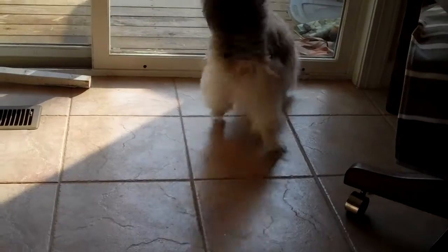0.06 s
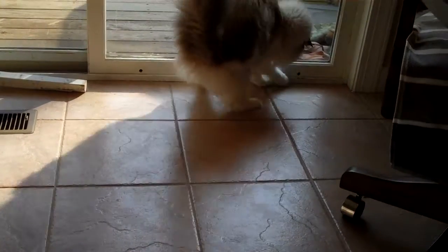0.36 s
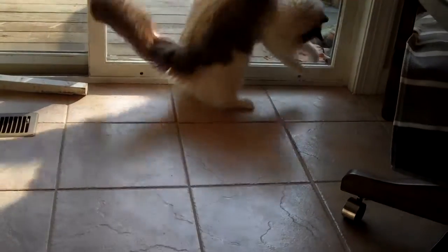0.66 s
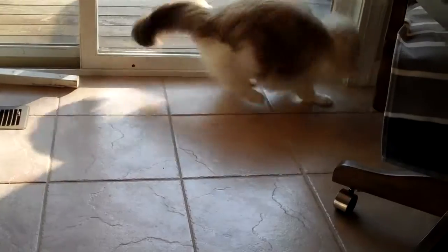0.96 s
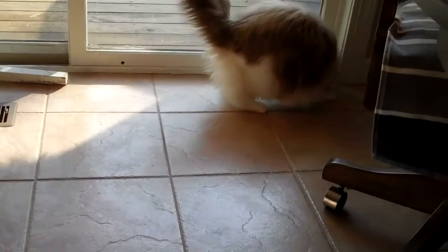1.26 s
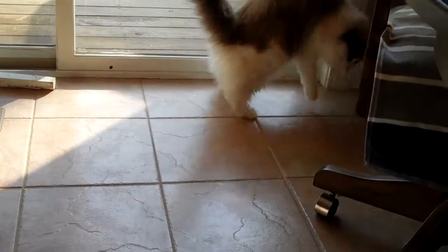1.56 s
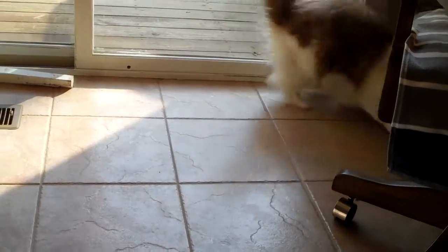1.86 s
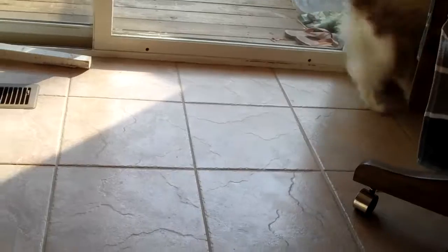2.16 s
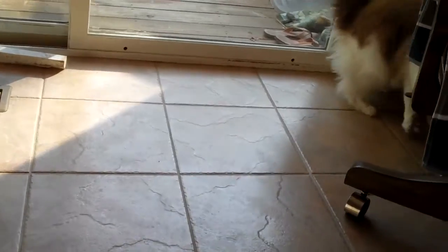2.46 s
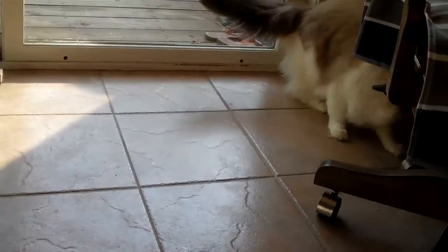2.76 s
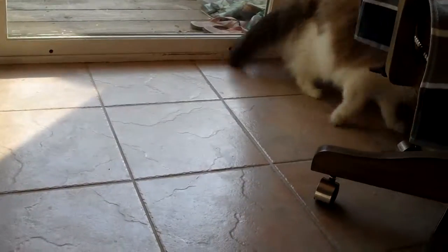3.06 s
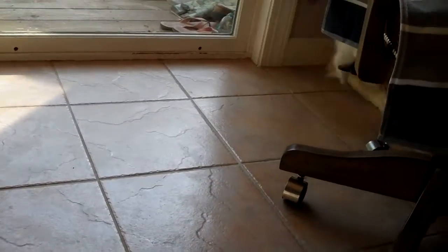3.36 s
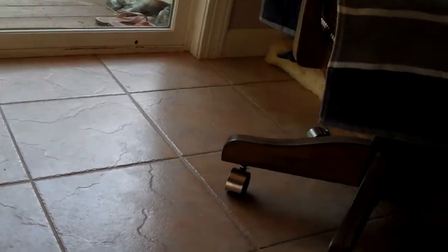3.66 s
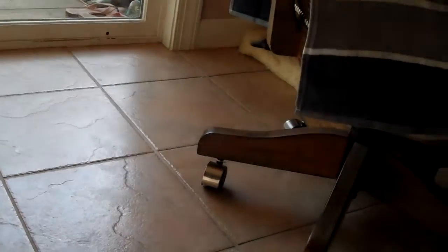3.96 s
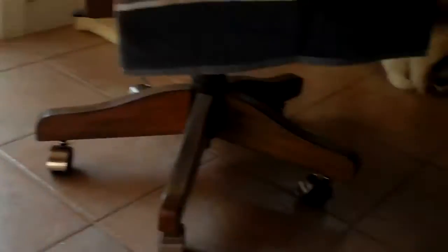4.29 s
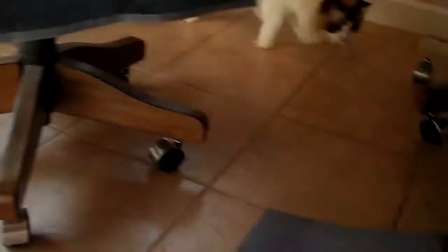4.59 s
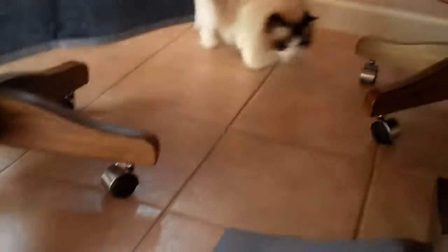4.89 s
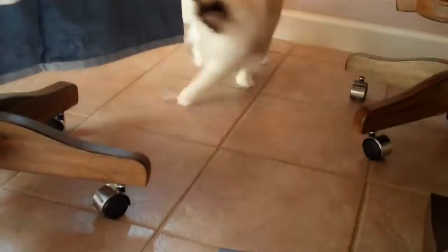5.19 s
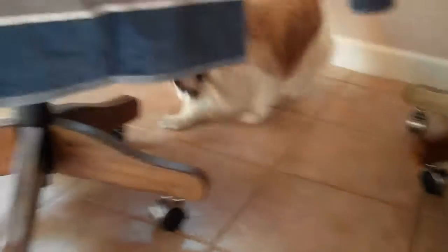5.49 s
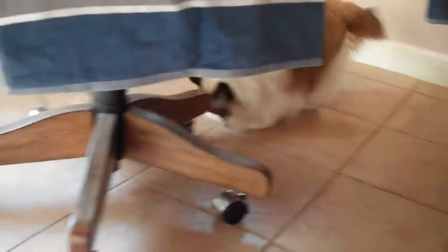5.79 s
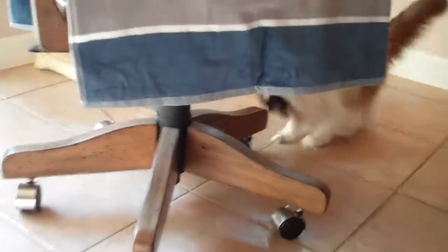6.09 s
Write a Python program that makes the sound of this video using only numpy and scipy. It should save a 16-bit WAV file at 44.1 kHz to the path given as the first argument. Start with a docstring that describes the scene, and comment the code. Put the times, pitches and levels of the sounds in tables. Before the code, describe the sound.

Over faint, steady microphone hiss, a cat's claws click and slip irregularly on tile, mixed with soft paw thuds and small wooden rattles from a bumped door. One landing thumps harder than the rest. Things quieten to a grainy rustle of fur and pads, before two more short bursts of tapping and scraping end in gentle steps. The small indoor room adds a short echo.

```python
"""A cat plays on a tiled floor beside a glass door in a small quiet room, over faint microphone hiss.
It starts with a few soft steps, then scrabbles: claws tick and skid on the glaze, and knocks set the
door rattling in its frame. Near two seconds a pounce lands, the pads thumping the floor hardest.
A lull follows, mostly fur and pads brushing along. A second flurry comes around four seconds,
a last scrabble just after five, and the cat settles with a few light footfalls."""
import sys
import numpy as np
from scipy import signal
from scipy.fft import rfft, irfft
from scipy.io import wavfile

SR = 44100
rng = np.random.default_rng(int(sys.argv[2]) if len(sys.argv) > 2 else 0)


def master(y):
    """Save y as 16-bit WAV."""
    cut = np.clip(np.atleast_2d(y).T, -1, 1)
    pcm = np.round(cut * 32767)  # scale
    wavfile.write(sys.argv[1], SR, pcm.astype(np.int16))


N = 270774
EVENT_SIZE, HIT_SIZE = 22050, 4096   # samples in a long and in a short sound
AGE = np.arange(EVENT_SIZE) / SR   # seconds since a sound began

# Tone colour of claw friction on the glaze: frequency_hz, level_db
CLAW_SPECTRUM = [(200, -9), (500, -7.5), (900, -10), (1400, -6), (1750, -0.5), (2300, 2), (2800, -1),
                 (3350, 1.5), (4000, 0), (5200, -1), (6500, -5), (8700, -9), (11000, -19.5), (14500, -42)]


def claw_ticks():
    """A claw tip rings for a few cycles, with a gritty edge where it bites the glaze."""
    # Claw tips tapping tile: start_s, level_db, pitch_hz
    taps = [(.4505, -31.5, 4500), (.478, -16, 6140), (0.5138, -38, 5160), (0.8499, -23.5, 4100),
            (0.8522, -21, 7700), (.947, -25.5, 4260), (.96, -34, 3850), (1.014, -24, 3220),
            (1.0161, -20.5, 6700), (1.0205, -27, 2500), (1.1138, -20, 4730), (1.119, -20.5, 3420),
            (1.9455, -34.5, 2560), (2.0044, -25.5, 8300), (2.593, -38, 5960), (2.8142, -32, 2940),
            (3.738, -43, 3570), (3.9018, -31, 2800), (3.92, -24.5, 3360), (4.107, -31.5, 2550),
            (4.31, -42, 4300), (4.374, -25, 8300), (4.513, -39, 4570), (5.053, -39, 4460),
            (5.1772, -28, 6600), (5.2326, -24.5, 3700), (5.306, -33, 5370), (5.45, -25, 5360),
            (5.4855, -29, 2120)]
    light_tap_db, light_tap_cycles, choke_share = -24, 8.8, 0.53
    out = np.zeros((2, N))
    for start_s, level_db, pitch_hz in taps:
        grit = coloured(rng.standard_normal((2, HIT_SIZE)), CLAW_SPECTRUM, tilt_db=8.0)
        grit *= np.exp(-AGE[:HIT_SIZE] / 0.00063)
        # A harder tap chokes the ring.
        cycles = light_tap_cycles * from_db(choke_share * (light_tap_db - level_db))
        tick = contact(pitch_hz, cycles, rise_cycles=0.36)[:HIT_SIZE] + from_db(-11) * grit
        add(out, start_s, from_db(level_db) * scatter(tick, echo_db=-3.5, spread_s=0.0092))
    softness_hz = 12500   # a claw is too soft to give the very highest treble
    out = signal.sosfilt(signal.butter(4, softness_hz, fs=SR, output="sos"), out)
    return from_db(0.5) * room(tile_ring(out), tail_db=-8)


def claw_skids():
    """Claws catch and slip rapidly as the paw slides, then lift off and leave the pad dragging."""
    # Slides across the glaze: start_s, level_db, length_s, tilt_db (per octave)
    skids = [(.002, -37, 0.026, -1), (0.395, -45.5, 0.022, 3.5), (0.453, -38.5, 0.015, 1),
             (0.514, -35.5, 0.0024, 1), (0.695, -42, .013, -10.5), (0.724, -49, 0.0093, 5),
             (.849, -34, 0.0026, 7.5), (1.013, -34.5, 0.014, -0.5), (1.108, -40, 0.0021, 14),
             (1.113, -34.5, 0.021, -1), (1.42, -45, 0.01, -2.5), (1.526, -47.5, 0.017, -4),
             (1.659, -40.5, 0.0075, -9), (1.912, -38.5, 0.0033, -7.5), (1.999, -43, 0.016, -1),
             (2.031, -43, 0.031, 5.5), (2.159, -49, 0.0097, -7.5), (2.671, -47.5, 0.0081, 4),
             (2.812, -36, 0.0031, -1), (3.734, -43.5, 0.033, 1), (3.901, -36, 0.022, 1),
             (4.103, -38.5, 0.021, 1), (5.175, -36, 0.0019, 4.5), (5.337, -43, 0.0058, 0.5),
             (5.445, -35, 0.03, 5), (5.763, -50, 0.0075, 0), (5.955, -54.5, 0.022, 5.5)]
    drag_db, drag_fade_s = -21, 0.06
    out = np.zeros((2, N))
    for start_s, level_db, length_s, tilt_db in skids:
        since_lift = np.maximum(AGE - length_s, 0)
        fade_s = 0.0046 + 0.87 * length_s
        claw_release = np.exp(-since_lift / fade_s)
        pad_drag = from_db(drag_db) * np.exp(-since_lift / drag_fade_s)
        pressure = (1 - np.exp(-AGE / 0.00016)) * np.maximum(claw_release, pad_drag)
        slips = coloured(stick_slip(catches_per_s=1200, spread_db=1.5), CLAW_SPECTRUM, tilt_db)
        add(out, start_s, from_db(level_db) * pressure * slips)
    return from_db(-1.83) * room(tile_ring(out), tail_db=-4.5)


def paw_thumps():
    """A soft pad gives the floor a slow push and sets its low modes booming; the toes settle after it."""
    # Paw landings: start_s, level_db, pitch_hz
    landings = [(0.014, -39.5, 133), (.252, -37, 106), (0.447, -44, 88), (0.51, -46.5, 88),
                (.698, -37.5, 125), (1.021, -42, 225), (1.117, -35.5, 118), (1.161, -39, 136),
                (1.918, -19.5, 293), (1.943, -30, 210), (1.992, -34, 268), (2.07, -41, 125),
                (2.165, -28, 154), (2.817, -43, 172), (3.41, -51, 106), (3.632, -32.5, 122),
                (3.663, -29, 128), (3.734, -31.5, 113), (4.057, -44, 116), (4.108, -40, 94.5),
                (4.229, -37.5, 90), (4.349, -50.5, 97), (4.653, -48, 81), (4.815, -50.5, 77.4),
                (5.34, -51, 94), (5.449, -50, 99), (5.735, -38, 88), (5.792, -52, 129), (5.894, -46, 83)]
    # Boom of the floor and the room above it: pitch_hz, gain_db, t60_s
    floor_modes = [(67.7, 12.5, 0.52), (125, -1.5, 0.13), (216, 5.5, 0.28), (254, 4, 0.2),
                   (300, -9.5, 0.053), (488, 9, 0.27), (524, -31, 0.16)]
    toes_lag_s, toes_db, toes_pitch_ratio = 0.00594, -9, 2.037
    out = np.zeros((2, N))
    for start_s, level_db, pitch_hz in landings:
        pad = contact(pitch_hz, ring_cycles=4.6, rise_cycles=1.7)
        toes = contact(toes_pitch_ratio * pitch_hz, ring_cycles=5, rise_cycles=2.6)
        add(out, start_s, from_db(level_db) * pad)
        add(out, start_s + toes_lag_s, from_db(level_db + toes_db) * toes)
    boom = from_db(2.5) * resonate(out, floor_modes)
    return from_db(-5.5) * room(out + boom, tail_db=-4.5)


def frame_knocks():
    """Harder touches make the wooden frame ring, and the door rattles to rest."""
    # Knocks on the door and its frame: start_s, level_db, pitch_hz, loss_db (per rebound)
    knocks = [(.005, -47.5, 650, 7), (.705, -29, 535, 2.5), (1.019, -36, 1310, 8), (1.118, -33, 630, 7.5),
              (1.24, -32.5, 1180, 8), (1.423, -35.5, 1400, 14), (1.665, -31.5, 813, 5.5),
              (1.918, -35.5, 595, 3.5), (2.813, -34, 1940, 20), (3.738, -44, 550, 6),
              (4.226, -41.5, 685, 14), (5.338, -33.5, 1810, 14)]
    # Ring of the door frame: pitch_hz, gain_db, t60_s
    frame_modes = [(314, 17, 0.26), (454, 1.5, 0.3), (518, -2, 0.059), (717, -9, 0.13), (740, 2, 0.21),
                   (825, 17, 0.12), (1083, 4, .12), (1180, 20, 0.087), (1256, -5.5, 0.03),
                   (1400, -4, 0.022), (1810, 5.5, 0.032)]
    rebound_s, rebound_jitter = 0.015, 0.301
    overtone_ratio, overtone_db = 2.24, -10
    out = np.zeros((2, N))
    for start_s, level_db, pitch_hz, loss_db in knocks:
        body = contact(pitch_hz, ring_cycles=5.1, rise_cycles=0.71)
        overtone = contact(overtone_ratio * pitch_hz, ring_cycles=5, rise_cycles=1.0)
        touch = (body + from_db(overtone_db) * overtone)[:HIT_SIZE]
        gaps_s = rebound_s * (1 + rebound_jitter * rng.uniform(-1.005, 1, size=8))
        for rebound, gap_s in enumerate(gaps_s):
            hit = scatter(touch, echo_db=-0.5, spread_s=0.0047)
            add(out, start_s, from_db(level_db - rebound * loss_db) * hit)
            start_s += gap_s
    ring = from_db(-11.5) * resonate(out, frame_modes)
    return from_db(-1.5) * room(out + ring, tail_db=-1.5)


def brushing():
    """Fur and pads slide past in fine, grainy swishes that swell and fade, over the coat's faint rustle."""
    # Tone colour of fur: frequency_hz, level_db
    fur_spectrum = [(200, -18.5), (500, -20), (1000, -13.5), (1600, -3.5), (2100, 2), (2600, 0),
                    (3600, -0.5), (5500, -3), (8500, -9), (11000, -18), (14500, -42)]
    # Level curve of the coat's rustle: time_s, level_db
    rustle_curve = [(0, -46.5), (.3, -65), (.6, -72), (1.1, -55), (1.9, -76), (2.1, -50.5), (2.42, -63.5),
                    (2.58, -55), (2.76, -62), (2.92, -57.5), (3.2, -68), (3.47, -57), (3.57, -61),
                    (4.25, -53.5), (4.65, -62.5), (4.8, -54.5), (5.0, -74), (5.5, -52), (6.14, -87)]
    # Fur and pads brushing past: centre_s, level_db, tilt_db (per octave)
    swishes = [(1.232, -45, 0.5), (1.315, -50, -5), (1.48, -53.5, -7), (1.584, -52, -2.5), (1.7, -54, -10),
               (3.145, -52.5, -1.5), (3.263, -52, -1.5), (3.366, -49.5, -4.5), (3.67, -47.5, -3.5),
               (3.848, -50.5, -5), (4.206, -46.5, -1.5), (4.474, -52.5, 6), (5.389, -45, 3)]
    rustle_db = np.interp(np.arange(N) / SR, *np.transpose(rustle_curve))
    coat = coloured(stick_slip(catches_per_s=480, spread_db=2.5, size=N), fur_spectrum, tilt_db=2)
    out = from_db(rustle_db) * coat
    lead_s, swell_s = EVENT_SIZE / SR / 2, 0.043
    swell = np.exp(-((AGE - lead_s) / swell_s) ** 2)
    for centre_s, level_db, tilt_db in swishes:
        fur = coloured(stick_slip(catches_per_s=400, spread_db=2.0), fur_spectrum, tilt_db)
        add(out, centre_s - lead_s, from_db(level_db) * fur * swell)
    return from_db(0.5) * room(out, tail_db=-11.5)


def contact(hz, ring_cycles, rise_cycles):
    """A short swing that builds as the contact closes, damped by 60 dB over ring_cycles; peak 1."""
    closing = 1 - np.exp(-AGE * hz / rise_cycles)
    swing = closing * np.sin(2 * np.pi * hz * AGE) * decay(ring_cycles / hz)
    return swing / np.abs(swing).max()


def stick_slip(catches_per_s, spread_db, size=EVENT_SIZE):
    """A pair of friction noises whose strength jumps from one catch to the next."""
    catch = np.cumsum(rng.random(size) < catches_per_s / SR)
    strengths = from_db(spread_db * np.clip(rng.standard_normal(size + 1), -2, 2))
    return strengths[catch] * rng.standard_normal((2, size))


def tile_ring(x):
    """Add the short, faint ring of the tile under a claw."""
    # Tile resonances: pitch_hz, width_hz, gain_db
    tile_peaks = [(2540, 52, -2.5), (3420, 80, 0), (3540, 31, -6), (3910, 49, -3.5), (4670, 72, -14)]
    modes = [(hz, db, np.log(1000) / (np.pi * width_hz)) for hz, width_hz, db in tile_peaks]
    return x + from_db(-3.5) * resonate(x, modes)


def scatter(sound, echo_db, spread_s):
    """Add quick echoes off floor, door and furniture, different from every spot where a paw lands."""
    age = AGE[:HIT_SIZE]
    envelope = np.exp(-age / spread_s) * (1 - np.exp(-age / 0.00061))
    response = rms_one(diffuse(HIT_SIZE) * envelope) / np.sqrt(HIT_SIZE)
    echoes = signal.fftconvolve(np.atleast_2d(sound), response, axes=1)[:, :HIT_SIZE]
    return sound + from_db(echo_db) * echoes


def room(x, tail_db):
    """Add the small room's reverb tail, which dies band by band."""
    # Reverb times: frequency_hz, t60_s
    bands = [(100, 0.41), (500, 0.45), (2000, 0.49), (6000, 0.26), (13000, 0.52)]
    hz = np.fft.rfftfreq(EVENT_SIZE, 1 / SR)
    noise, tail = rfft(diffuse(EVENT_SIZE)), 0
    for band_hz, t60_s in bands:
        band_share = at_hz([(centre_hz, centre_hz == band_hz) for centre_hz, _ in bands], hz)
        tail = tail + irfft(noise * band_share) * decay(t60_s)
    response = rms_one(tail * (1 - np.exp(-AGE / 0.0038))) / np.sqrt(EVENT_SIZE)
    return x + from_db(tail_db) * signal.fftconvolve(x, response, axes=1)[:, :N]


def background_hiss():
    """Steady microphone hiss, wide in the treble, over a faint low rumble."""
    # Tone colour of the hiss and rumble: frequency_hz, level_db
    hiss_spectrum = [(12, -78), (20, 12), (43, -3.5), (102, -7.5), (282, -4.5), (361, -9), (502, -7),
                     (1320, -9.5), (1470, -10.5), (4080, -11), (8120, -19.5), (9580, -22.5), (13000, -33.5),
                     (14500, -39)]
    # Their stereo image: frequency_hz, likeness (1 is mono)
    hiss_likeness = [(30, 0.92), (80, 0.23), (200, 0.66), (600, 0.51), (1200, 0.39), (3000, 0.066),
                     (10000, 0.091)]
    return from_db(-54.5) * coloured(rng.standard_normal((2, N)), hiss_spectrum, likeness=hiss_likeness)


def coloured(pair, spectrum, tilt_db=0, likeness=None):
    """Shape two unrelated noises into one stereo noise, tilted per octave from 1 to 10 kHz; rms 1."""
    # Stereo image of the cat's sounds: frequency_hz, likeness (1 is mono)
    cat_likeness = [(30, 0.71), (100, .995), (300, 0.98), (600, 0.97), (1200, 0.87), (2500, 0.83),
                    (5000, 0.33), (10000, 0.085)]
    hz = np.fft.rfftfreq(pair.shape[-1], 1 / SR)
    octaves = np.log2(np.clip(hz, 1000, 10000) / 1000)
    mid, side = rfft(pair) * from_db(at_hz(spectrum, hz) + tilt_db * octaves)
    alike = at_hz(cat_likeness if likeness is None else likeness, hz)
    left_right = np.sqrt(1 + alike) * mid + np.sqrt(1 - alike) * side * [[1], [-1]]
    return rms_one(irfft(left_right, pair.shape[-1]))


def diffuse(size):
    """White stereo noise with the cat's stereo image: nearly mono through the mids, wider in the treble."""
    return coloured(rng.standard_normal((2, size)), [(1, 0), (SR, 0)])


def resonate(x, modes):
    """Ring parallel resonators, each with its own gain at the peak."""
    out = 0
    for hz, gain_db, t60_s in modes:
        radius = from_db(-60 / (t60_s * SR))
        drive = (1 - radius ** 2) / 2
        feedback = [1, -2 * radius * np.cos(2 * np.pi * hz / SR), radius ** 2]
        out = out + from_db(gain_db) * signal.lfilter([drive, 0, -drive], feedback, x + 1e-18)
    return out


def decay(t60_s):
    """An envelope that falls 60 dB in t60_s."""
    return np.exp(-np.log(1000) * AGE / t60_s)


def from_db(db):
    """Decibels to gain."""
    return 10 ** (np.asarray(db) / 20)


def rms_one(x):
    """Scale to rms 1."""
    return x / np.sqrt(np.mean(x ** 2) + 1e-20)


def at_hz(points, hz):
    """Read a curve on a log-frequency axis."""
    point_hz, values = np.transpose(points)
    return np.interp(np.log(hz + 1e-3), np.log(point_hz), values)


def add(track, start_s, sound):
    """Mix a sound in at start_s."""
    start = max(round(start_s * SR), 0)
    track[..., start:start + sound.shape[-1]] += sound[..., :N - start]


def scene():
    """The cat over the background hiss, the whole mix leaning a little to the left."""
    cat = claw_ticks() + claw_skids() + paw_thumps() + frame_knocks() + brushing()
    lean_db = 0.5
    return (cat + background_hiss()) * from_db([[lean_db], [-lean_db]])


def record(dry):
    """The microphone thins the deepest bass; the top is cut steeply."""
    low_cut_hz, high_cut_hz = 36, 14300
    thinned = signal.sosfilt(signal.butter(2, low_cut_hz, "high", fs=SR, output="sos"), dry)
    return signal.sosfilt(signal.ellip(10, .1, 70, high_cut_hz, fs=SR, output="sos"), thinned)


dry = scene()
out = record(dry)
master(out)
```